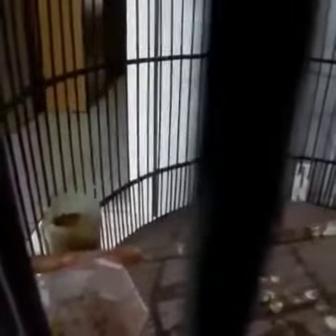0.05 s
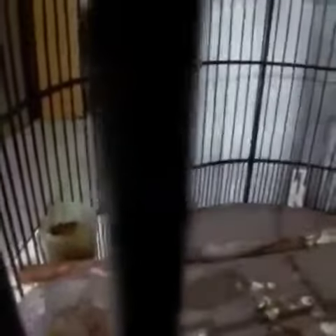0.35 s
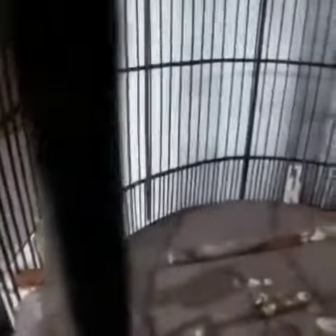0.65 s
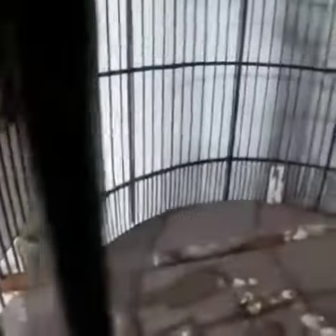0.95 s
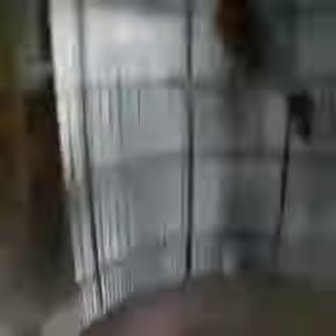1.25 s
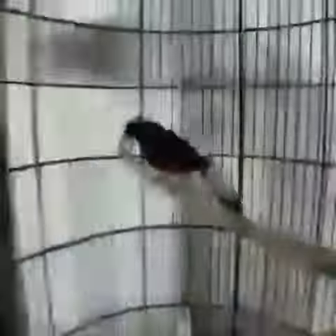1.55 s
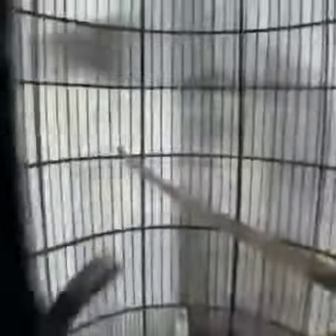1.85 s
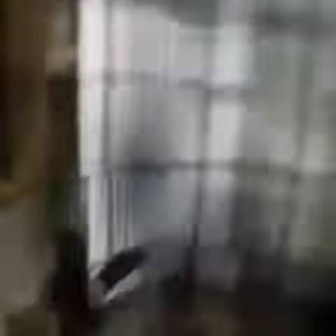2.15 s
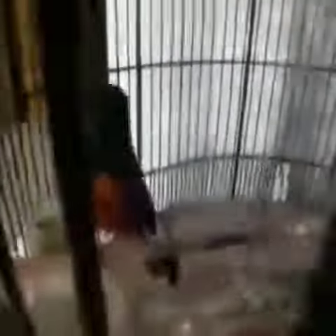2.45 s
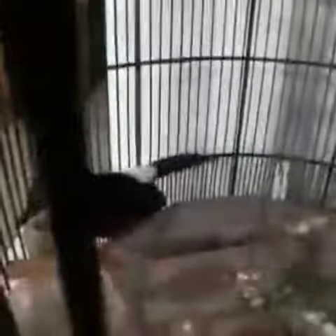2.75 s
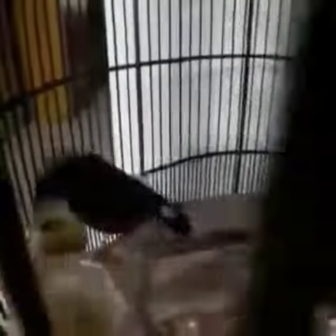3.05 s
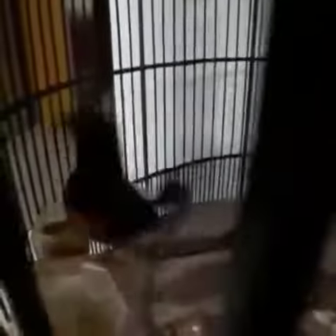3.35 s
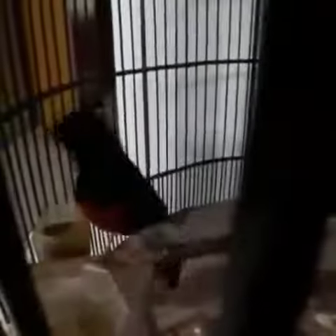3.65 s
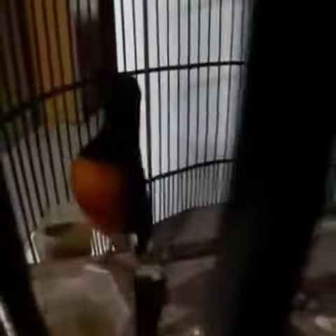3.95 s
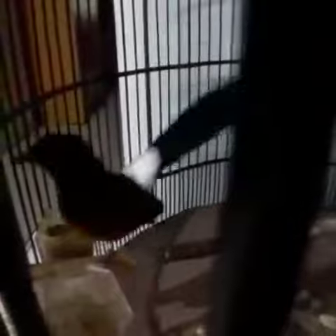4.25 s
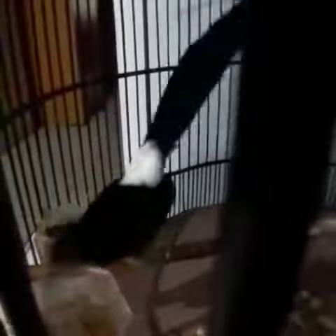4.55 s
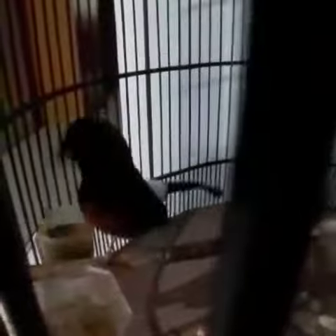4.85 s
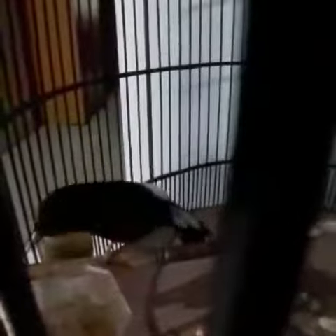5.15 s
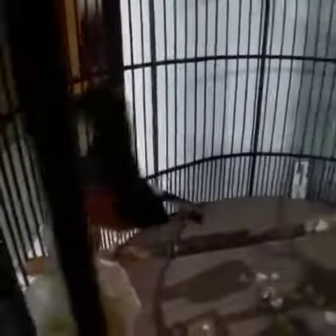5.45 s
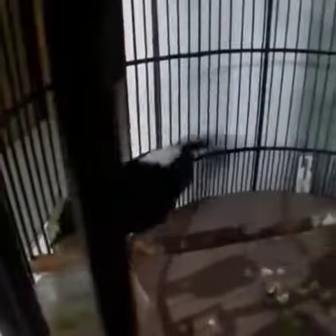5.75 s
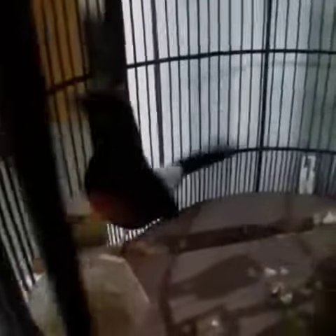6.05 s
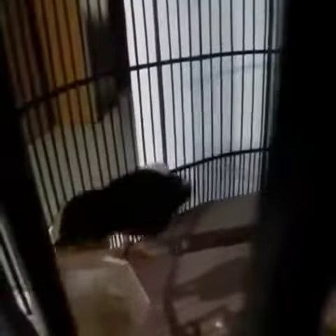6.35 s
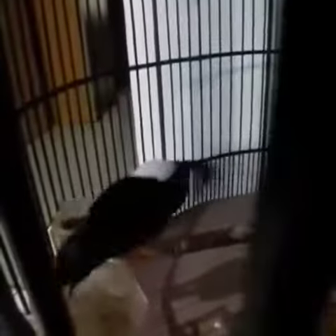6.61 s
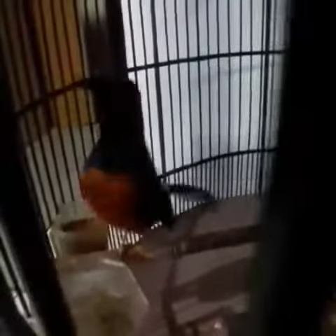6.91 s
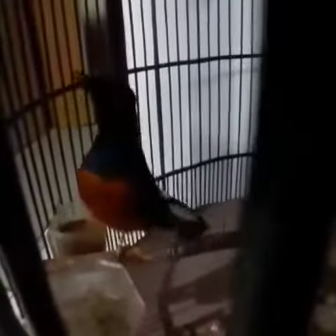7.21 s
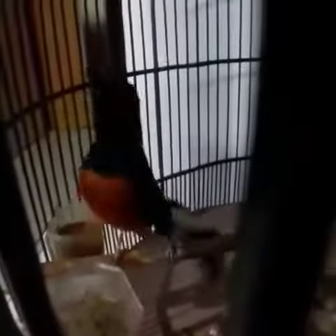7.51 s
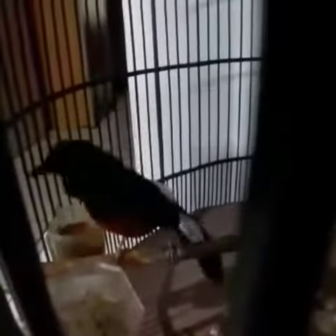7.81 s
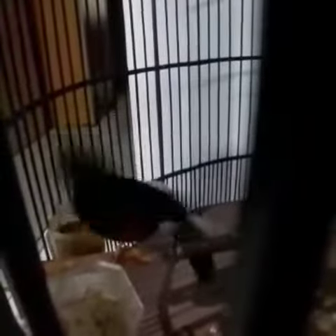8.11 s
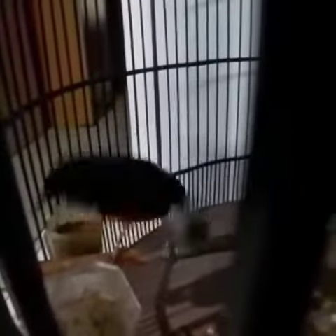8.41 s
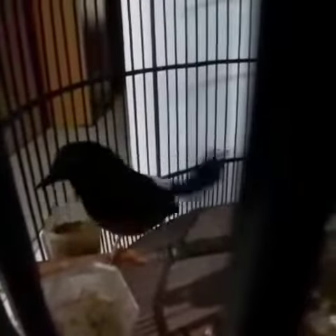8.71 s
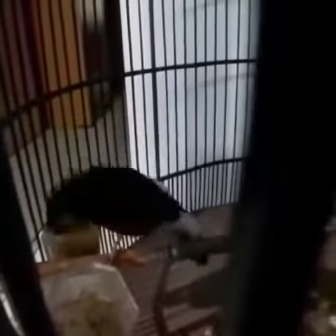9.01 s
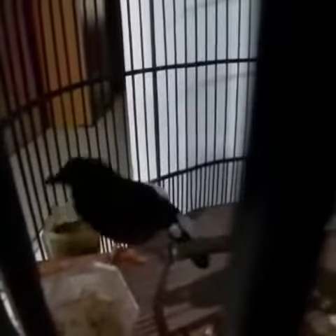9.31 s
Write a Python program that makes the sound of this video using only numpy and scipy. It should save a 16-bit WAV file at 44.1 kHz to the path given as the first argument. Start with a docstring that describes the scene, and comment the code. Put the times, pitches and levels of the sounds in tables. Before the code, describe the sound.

A thin, distant whistle rises slowly for the first 1.3 seconds over faint handling rumble and hiss, while claws tick lightly on a wire cage. From about 1.3 seconds a close songbird gives loud, very short notes with gaps between: raspy falling slurs, clear whistles and trills. Behind it a second bird scolds in nasal falling chips, about six a second, from 2.1 to 4 seconds and again from 5 to 7.7. The close bird adds a dry click near 3.9, harsh screeches at 4.5 and 4.8, then fast sweeps, high pips and chirps from 6 to 6.8, with claw scratches and soft cage bumps. Two more dry clicks come around 7.3 and 7.5. Two low, flute-like whistles climb, quaver and fall, at about 7.6 and 8.9 seconds. Feathers softly brush the cage near 9.3. Hard walls add a brief ring throughout.

```python
"""A thin far whistle opens the scene over handling rumble and faint hiss; claws tick on a wire cage.
The caged shama's syrinx gives raspy slurs, whistles and trills, and a second bird scolds behind it in
nasal falling chips, about six a second, a harmonic stack filtered by its throat. The shama adds dry
taks, screeches, sweeps, pips and chirps, then two low quavering arches; last, feathers brush the cage.
Hard walls ring briefly throughout."""
import sys
import numpy as np
from scipy import signal
from scipy.fft import rfft, irfft, next_fast_len
from scipy.io import wavfile
from scipy.ndimage import uniform_filter1d, minimum_filter1d

SR = 44100
rng = np.random.default_rng(int(sys.argv[2]) if len(sys.argv) > 2 else 0)


def dump_mix(stems):
    """Bounce the given channels to the path in sys.argv[1] as a 16-bit WAV at rate SR."""
    frames = np.atleast_2d(stems).T  # one column per channel
    limited = np.clip(frames, -1, 1)  # hard clip at full scale
    pcm = np.round(limited * 32767).astype(np.int16)
    wavfile.write(sys.argv[1], SR, pcm)


N = 417613

# Level of the handling rumble, and of the background hiss, which drops away during the pause
# between the arches. Each row: time in seconds, level in dB.
RUMBLE_LEVELS = [(6.45, -66), (9.002, -69.5), (9.259, -56.5)]
HISS_LEVELS = [(.3, -82), (.55, -78.5), (1, -66.5), (7.9, -68.5), (8.1, -82.5), (9.1, -75.5), (9.2, -71)]
# Spectra of the noises, the scolder's throat and the microphone. Each row: frequency in Hz, gain in dB.
RUMBLE_SPECTRUM = [(25, -42), (66, -0.5), (115, -8.5), (420, -23.5), (4000, -45)]
HISS_SPECTRUM = [(1500, -21.5), (6400, -9.5), (15000, -33)]
CLAW_SPECTRUM = [(120, -45), (900, -4.5), (5550, -6), (15000, -30.5)]
BUMP_SPECTRUM = [(120, -11), (400, -5.5), (700, -6.5), (2000, -48.5)]
TAK_SPECTRUM = [(500, -44), (1100, -4.5), (6210, 1.5), (9000, -13), (15500, -38.5)]
THROAT_RESPONSE = [(700, -35), (1100, -18.5), (1400, -20), (2000, -11), (2400, 1.5), (2950, -1.5),
                   (3300, -16), (4250, -20), (4900, -33.5), (6400, -25.5), (7150, -25), (8200, -54),
                   (13500, -46)]
MICROPHONE_RESPONSE = [(7200, 4), (8200, -2), (9300, -12.5), (10500, 0.5), (13000, 9)]
# Reverberation of the walls. Each row: frequency in Hz, time to decay by 60 dB in seconds.
WALL_DECAY = [(300, 0.72), (1300, 0.41), (2700, 0.42), (12000, 0.16)]
# Course of the far whistle. Each row: time in seconds, pitch in Hz, relative level in dB.
FAR_PATH = [(0, 1633, -59.5), (.4, 1795, -57.5), (1.1, 1904, -65.5), (1.3, 1930, -54)]
# Claws on wire and perch, soft cage bumps, the shama's dry taks, and feathers brushing the cage.
# Each row: start in seconds, level in dB, length in seconds.
CLAW_TICKS = [(.251, -52.5, .002), (.333, -53.5, 0.0095), (.352, -52, 0.004), (.721, -45, .003),
              (.759, -45, 0.043), (.861, -50.5, .004), (.985, -47, 0.026), (1.52, -42.5, 0.0031),
              (4.466, -51, .003), (6.43, -35.5, 0.057), (6.753, -41.5, 0.036), (9.267, -53.5, 0.0095),
              (9.41, -52.5, 0.0079)]
CAGE_BUMPS = [(.8, -65, 0.087), (6.41, -59.5, 0.042), (6.745, -65.5, 0.026)]
TAK_CALLS = [(3.904, -36, 0.027), (7.286, -33.5, 0.019), (7.538, -35.5, 0.024)]
FEATHER_RUSTLES = [(9.2, -62.5, 0.34)]
# Breaking slurs. Each row: start, rise and fall in seconds, top and end pitch in Hz, level at the top
# and after the break in dB, relative rasp, overtones in dB, pan (left over right) in dB.
SLUR_NOTES = [ (1.346, .027, 0.13, 3690, 1173, -25.5, -19, 0, -32, 9),
              (1.88, 0.038, 0.085, 3645, 1463, -22, -13, 0.24, -13.5, 4),
              (2.903, .033, 0.077, 3802, 1590, -12.5, -19.5, 0.8, -24, -4.5)]
# Clear whistles and dives. Each row: start and length in seconds, first and last pitch in Hz,
# level, overtones and pan in dB.
WHISTLE_NOTES = [ (1.525, .048, 2650, 3262, -14, -15, 25), (3.176, 0.037, 2660, 2983, -10.5, -22, 10),
                 (3.395, 0.016, 2107, 2480, -15, -30, 14.5), (3.419, 0.014, 2317, 2387, -7.5, -36, 7),
                 (3.543, 0.046, 3280, 3179, -16.5, -18.5, 10.5), (3.767, 0.024, 2210, 2340, -16, -47, 13),
                 (3.787, 0.03, 2550, 2560, -17, -39.5, 34), (4.51, 0.021, 5400, 3254, -15, -8, 2),
                 (4.865, .015, 2637, 2230, -14.5, -33.5, 1.5), (6.419, 0.027, 4563, 5160, -13, -18, 6.5),
                 (6.463, .02, 5475, 3580, -14.5, -19, -5.5), (6.637, 0.036, 2744, 3090, -10.5, -21.5, 7)]
# Trills; overlapping rows add a second voice or a high chattering overtone. Each row: start and length
# in seconds, first and last pitch in Hz, first and last level in dB, swings a second,
# swing as a share of pitch, overtones and pan in dB.
TRILL_NOTES = [ (1.71, 0.066, 2805, 2600, -18, -13, 60, 0.046, -32.5, 10.5),
               (1.724, 0.073, 2263, 2174, -19, -22.5, 95, 0.071, -37, -5),
               (2.985, 0.05, 6380, 6640, -36.5, -30.5, 67, 0.051, -26.5, 6.5),
               (2.989, 0.042, 4635, 4900, -35, -33.5, 58, .09, -21, 7),
               (3.022, 0.062, 3500, 3365, -29, -13, 84, 0.043, -10.5, -6),
               (4.538, 0.08, 1825, 1390, -18, -33, 75, .19, -7, 0),
               (6.785, 0.039, 1858, 2137, -22.5, -20, 46.5, 0.1, -2.5, 8)]
# Two bouts of scolding. Each row: the starts of one bout's chips in seconds.
SCOLD_BOUTS = [
    [2.114, 2.27, 2.425, 2.575, 2.731, 2.893, 3.056, 3.201, 3.351, 3.491, 3.632, 3.784, 3.959],
    [5.019, 5.181, 5.338, 5.506, 5.687, 5.858, 6.021, 6.208, 6.384, 6.555, 6.69, 6.826, 6.98, 7.188, 7.42,
     7.631],
]
# Each bout warms up, then tires. Each row: time in seconds, top pitch in Hz, relative level in dB.
BOUT_EFFORT = [(2.111, 689.3, -28.5), (2.6, 747, -23.5), (3.35, 714.2, -24), (5.02, 715.3, -27),
               (6.1, 721, -23), (6.948, 699, -30.5)]
# Course of a typical chip. Each row: share of its length, pitch factor, relative level in dB.
CHIP_PATH = [(0, .94, -12), (.19, 1, 0), (.48, 0.94, -3), (.82, .85, -3.5), (1, .74, -3.5)]
# Harsh screeches. Each row: start, rise and fall in seconds, top and end pitch in Hz,
# level and fade in dB, top of the undertone in Hz, overtones and pan in dB.
SCREECH_NOTES = [(4.484, .033, 0.011, 5114, 3067, -14, 1, 1672, -22, 3.5),
                 (4.798, .046, .11, 2812, 1866, -13.5, 19, 1420, -14.5, 22)]
# Fast sweeps. Each row: start and length in seconds, first and last pitch in Hz,
# crest as a share of the length, level at and after the crest in dB, pan in dB.
SWEEP_NOTES = [(6.036, 0.053, 1402, 3535, 0.56, -8.5, -20, 9.5),
               (6.225, 0.056, 1540, 3260, 0.35, -9.5, -27.5, 10),
               (6.394, 0.025, 620.7, 2804, 0.91, -13, -18, 6.5),
               (6.489, .024, 2430, 1104, 0.26, -15.5, -34, 12.5)]
# Pips. Each row: start and length in seconds, pitch at the ends and middle in Hz, level and pan in dB.
PIP_NOTES = [(6.431, 0.014, 4310, 5270, -9, 7), (6.45, 0.012, 3840, 5345, -5, 14.5),
             (6.741, 0.012, 3880, 5360, -7.5, 14.5), (6.754, 0.0057, 8370, 6230, -9.5, 16),
             (6.761, 0.01, 3820, 4980, -11, 23), (6.764, 0.02, 7900, 5400, -13.5, 27)]
# Low chirps. Each row: start in seconds, level in dB.
CHIRP_NOTES = [(6.54, -32), (6.596, -36.5)]
# Low arches. Each row: start and climb in seconds, relative climb level in dB, first crest in seconds,
# number of quavers, quavers a second, relative crest level in dB, fall in seconds, end pitch in Hz.
ARCH_NOTES = [(7.557, .16, -26.5, 7.806, 3, 24.7, -22.5, 0.098, 794),
              (8.851, .183, -23.5, 9.15, 4, 26.47, -16, 0.13, 852)]
# Pitch of an arch in Hz: at its foot, at the end of the climb, at the top.
ARCH_PITCHES = (772, 1215, 1299.6)


def amp(db):
    """Amplitude grows tenfold for every 20 dB."""
    return 10 ** (np.asarray(db) / 20)


def unit(x):
    """Normalisation brings the rms to 1."""
    return x / np.sqrt(np.mean(x ** 2) + 1e-20)


def read(points, hz):
    """A spectrum is interpolated on a log-frequency axis."""
    freqs, values = np.transpose(points)
    return np.interp(np.log(hz + 1), np.log(freqs), values)


def colour(x, points):
    """Linear filtering multiplies the spectrum by a response, given in dB."""
    size = next_fast_len(x.shape[-1] + 2000)
    gain = amp(read(points, np.fft.rfftfreq(size, 1 / SR)))
    return irfft(rfft(x, size) * gain, size)[..., :x.shape[-1]]


def wander(size, hz):
    """Noise low-passed at hz gives random motion of rms 1."""
    lowpass = signal.butter(2, hz, fs=SR, output="sos")
    return unit(signal.sosfilt(lowpass, rng.standard_normal(size + 4000))[4000:])


def add(mix, s, sound):
    """Superposition: a sound joins the mix at s seconds."""
    part = mix[..., max(round(s * SR), 0):][..., :sound.shape[-1]]
    part += sound[..., :part.shape[-1]]


def clock(length):
    """Time within a note runs in seconds and as a share of its length."""
    t = np.arange(0, length, 1 / SR)
    return t, t / length


def rise_and_fall(rise, fall):
    """A two-part note has a time, and a progress from 0 to 1 for each part."""
    t, _ = clock(rise + fall)
    return t, np.minimum(t / rise, 1), np.maximum(t - rise, 0) / fall


def follow(rows):
    """Interpolation turns breakpoints into sample times and smooth curves."""
    s, *columns = np.transpose(rows)
    s = np.sort(s)
    t = np.arange(s[0], s[-1], 1 / SR)
    return t, *(uniform_filter1d(np.interp(t, s, c), size=130) for c in columns)


def faded(x):
    """A 2 ms taper at each end keeps a note from clicking."""
    return x * signal.windows.tukey(len(x), min(1, .004 * SR / len(x)))


def place(x, pan_db, lead_ms):
    """Direction is heard as a level and a time difference between two microphone ports."""
    size = next_fast_len(len(x) + 100)
    delay = np.exp(-2j * np.pi * np.fft.rfftfreq(size, 1000 / SR) * lead_ms)
    right = irfft(rfft(x, size) * delay, size)[:len(x)]
    return np.array([x, right]) * unit(amp([[pan_db / 2], [-pan_db / 2]]))


def walls(x, early_db, late_db):
    """Reverberation: a few near reflections, then a dense tail that dies faster in the treble."""
    taps = rng.choice([-1., 1.], (2, SR)) * (rng.random((2, SR)) < 4000 / SR)
    taps[:, :round(.007 * SR)] = 0
    hz, t, spectra = signal.stft(taps, SR, nperseg=256)
    decay = amp(-60 * t / read(WALL_DECAY, hz)[:, None])
    response = signal.istft(spectra * decay, SR, nperseg=256)[1]
    response *= amp(late_db) / np.linalg.norm(response[0])
    for side in response:
        arrivals = (rng.uniform(.002, .02, size=8) * SR).astype(int)
        side[arrivals] += amp(early_db) * rng.choice([-1, 1], size=8) / np.sqrt(8)
    return signal.fftconvolve(x[None], response, axes=1)[:, :N]


def syrinx(t, hz, db, overtone_db, rasp=0):
    """A nearly pure oscillation turns to a rasp under random modulation of pitch and amplitude."""
    hz = hz * (1 + (.006 + .13 * rasp) * wander(len(t), 540))
    phase = 2 * np.pi * np.cumsum(hz) / SR
    overtones = sum(amp(overtone_db - 15 * (k - 2)) * np.sin(k * phase) * (k * hz < SR / 2)
                    for k in range(2, 6))
    flutter = 1 + .45 * rasp * wander(len(t), 2400)
    return faded(amp(db) * unit(flutter) * (np.sin(phase) + overtones))


def background():
    """Coherence: handling rumble is nearly alike in both ports, while the faint hiss is independent."""
    t = np.arange(N) / SR
    shared, *own = rng.standard_normal((3, N))
    rumble = unit(colour(shared * amp([[1], [-1]]) + .26 * np.array(own), RUMBLE_SPECTRUM))
    hiss = unit(colour(np.array(own), HISS_SPECTRUM))
    rumble_db = np.interp(t, *np.transpose(RUMBLE_LEVELS))
    hiss_db = np.interp(t, *np.transpose(HISS_LEVELS))
    return amp(rumble_db) * rumble + amp(hiss_db) * hiss


def far_whistle(flicker_db=9):
    """At a distance reverberation outweighs direct sound; the thin tone rises slowly and falters."""
    voice = np.zeros(N)
    add(voice, FAR_PATH[0][0], syrinx(*follow(FAR_PATH), overtone_db=-41))
    voice *= amp(flicker_db * np.tanh(wander(N, 16)) - 14)
    return voice + walls(voice, early_db=-9, late_db=17)


def rattles(rows, spectrum, rate_hz, ring_s, late_db):
    """Uneven pulse trains, hardest at first, excite noise that decays exponentially after each pulse."""
    clicks = np.zeros((2, N))
    for s, db, length in rows:
        t = np.arange(round((length + .0093) * SR)) / SR
        pulses = np.cumsum(rate_hz * np.exp(.33 * wander(len(t), 620))) / SR
        ringing = np.exp(-(pulses % 1) / rate_hz / ring_s)
        accent = 1 + .5 * np.exp(-t / .0052)
        release = np.exp(-np.maximum(t - length, 0) / .0011)
        shared, *own = rng.standard_normal((3, len(t)))
        burst = ringing * accent * release * (4.3 * shared + np.array(own))
        add(clicks, s, amp(db) * unit(colour(burst, spectrum)))
    return clicks + walls(clicks[0], early_db=-2, late_db=late_db)


def slurs(break_s=.0059, break_ratio=.72):
    """A register break: the voice scoops to the top, drops, and tumbles on downward."""
    for s, rise, fall, top_hz, end_hz, top_db, fall_db, rasp, overtone_db, pan_db in SLUR_NOTES:
        t, up, down = rise_and_fall(rise, fall)
        broken = np.clip((t - rise) / break_s, 0, 1)
        high_hz = top_hz * (1 - .15 * (1 - up) ** 2)
        low_hz = (break_ratio * top_hz) ** (1 - down) * end_hz ** down
        tumble = 1 + .12 * np.sqrt(down) * wander(len(t), 261.6)
        hz = (1 - broken) * high_hz + broken * low_hz * tumble
        db = (1 - broken) * (top_db - 22.5 * (1 - up) ** 2.1) + broken * (fall_db - 29 * down)
        roughening = .13 + 1.65 * broken * np.sqrt(down)
        yield s, syrinx(t, hz, db, overtone_db, rasp * roughening), pan_db


def whistles():
    """A slowing glide: the pitch eases onto its goal while the tone swells."""
    for s, length, from_hz, to_hz, level_db, overtone_db, pan_db in WHISTLE_NOTES:
        t, u = clock(length)
        hz = to_hz + (from_hz - to_hz) * (1 - u) ** 2.2
        db = level_db - np.interp(u, [0, .38, 1], [14.5, 0, 2.5])
        yield s, syrinx(t, hz, db, overtone_db, rasp=.048), pan_db


def trills(dip_db=5):
    """Frequency and amplitude modulation run in step around a glide; wider swings are rougher."""
    for s, length, from_hz, to_hz, from_db, to_db, rate, swing, overtone_db, pan_db in TRILL_NOTES:
        t, u = clock(length)
        low = np.cos(2 * np.pi * rate * t)
        hz = (from_hz + (to_hz - from_hz) * u) * (1 - swing * low)
        db = from_db + (to_db - from_db) * u - dip_db * (1 + low) / 2
        yield s, syrinx(t, hz, db, overtone_db, rasp=1.1 * swing), pan_db


def perch_knock(start_s=1.806, level_db=-40.5, hz=910, t60_s=.021):
    """One damped mode of the wooden perch rings as the bird lands."""
    wood = np.zeros(N)
    t, u = clock(t60_s)
    add(wood, start_s, amp(level_db - 60 * u) * np.sin(2 * np.pi * hz * t))
    return wood


def scolding(chip_s=.08, hiss_db=-21, odd_db=-7, waver_db=4, turned_db=-2):
    """Source and filter: falling harmonics pass a throat resonance that picks out the fourth."""
    voice, direct = np.zeros((2, N))
    when, *effort = np.transpose(BOUT_EFFORT)
    for bout, facing_db in zip(SCOLD_BOUTS, (0, turned_db)):  # turned away for the second bout
        for s in bout:
            top_hz, level_db = (np.interp(s, when, column) for column in effort)
            stretch, sag, mouth = 1 + .06 * rng.standard_normal(3) * [1, 2, .3]  # no two chips alike
            path = [(s + share * chip_s * stretch, factor ** sag, db) for share, factor, db in CHIP_PATH]
            t, bend, shape_db = follow(path)
            hz = top_hz * bend * (1 + .0067 * (wander(len(t), 550) + wander(len(t), 20)))
            phase = 2 * np.pi * np.cumsum(hz) / SR
            stack = sum(amp(read(THROAT_RESPONSE, k * hz / mouth) + odd_db * (k % 2)) * np.sin(k * phase)
                        for k in range(1, 22))
            hiss = unit(colour(rng.standard_normal(len(t)), THROAT_RESPONSE))
            envelope = amp(level_db + shape_db + waver_db * np.tanh(wander(len(t), 50)))
            chip = faded(envelope * (stack + amp(hiss_db) * hiss))
            add(voice, s, chip)
            add(direct, s, amp(facing_db) * chip)
    reflected = walls(voice, early_db=-8, late_db=-3.5) * amp([[-2], [2]])
    return place(direct, pan_db=-7.5, lead_ms=.12) + reflected


def screeches(under_db=-17, onset_rasp=.25, full_rasp=.64):
    """Biphonation: a harsh tone and a weaker undertone bend together, roughening as they swell."""
    for s, rise, fall, top_hz, end_hz, level_db, fade_db, under_hz, overtone_db, pan_db in SCREECH_NOTES:
        t, up, down = rise_and_fall(rise, fall)
        bend = (1 - .26 * (1 - up) ** 2) * (end_hz / top_hz) ** (down ** .66)
        db = level_db - 29 * (1 - up) - fade_db * down
        rasp = onset_rasp + (full_rasp - onset_rasp) * up ** 2
        upper = syrinx(t, top_hz * bend, db, overtone_db, rasp)
        lower = syrinx(t, under_hz * bend, db + under_db, overtone_db, rasp)
        yield s, upper + lower, pan_db


def sweeps(swell_s=.0069, break_s=.002):
    """A linear frequency sweep swells to a crest, then goes on weaker and rougher."""
    for s, length, from_hz, to_hz, crest, crest_db, after_db, pan_db in SWEEP_NOTES:
        t, u = clock(length)
        past_crest = t - crest * length
        broken = np.clip(past_crest / break_s, 0, 1)
        swell_db = crest_db - 10.5 * np.tanh((past_crest / swell_s) ** 2)
        db = (1 - broken) * swell_db + broken * after_db
        hz = from_hz + (to_hz - from_hz) * u
        tone = syrinx(t, hz, db, overtone_db=-36.5 + 17 * broken, rasp=.17 * broken)
        yield s, np.minimum(u / crest, 1) * tone, pan_db


def pips():
    """Half a cycle of frequency modulation swings a pure tone out and back, loudest in the middle."""
    for s, length, ends_hz, middle_hz, level_db, pan_db in PIP_NOTES:
        t, u = clock(length)
        swing = np.sin(np.pi * u)
        hz = ends_hz + (middle_hz - ends_hz) * swing
        yield s, swing ** 2 * syrinx(t, hz, level_db, overtone_db=-32), pan_db


def chirps(length_s=.025, ends_hz=843, top_hz=1910, pan_db=2):
    """Triangular frequency modulation carries a low tone quickly up and back."""
    for s, level_db in CHIRP_NOTES:
        t, u = clock(length_s)
        hz = np.interp(abs(2 * u - 1), [0, 1], [top_hz, ends_hz])
        yield s, syrinx(t, hz, level_db, overtone_db=-9.5, rasp=.22), pan_db


def arches(foot_s=.04, hush_s=.033, attack_s=.034, release_s=.038):
    """A flute-like tone climbs, hushes, quavers by joint pitch and amplitude modulation, and falls."""
    voice = np.zeros(N)
    foot_hz, climb_hz, top_hz = ARCH_PITCHES
    for s, climb, climb_db, crest, quavers, rate, top_db, fall, end_hz in ARCH_NOTES:
        end = crest + quavers / rate
        t = np.arange(s - foot_s, end + fall + release_s, 1 / SR)
        up = np.clip((t - s) / climb, 0, 1)
        across = np.clip((t - crest) / (end - crest), 0, 1)
        down = np.clip((t - end) / fall, 0, 1)
        rise_edges = np.maximum((s - t) / foot_s, 0) ** 2 + np.maximum(t - s - climb, 0) / hush_s
        rise_db = climb_db - 17 * (1 - up) - 30 * rise_edges
        rise_hz = foot_hz + (climb_hz - foot_hz) * up ** .62
        edges = np.maximum((crest - t) / attack_s, 0) ** 2 + np.maximum(t - end - fall, 0) / release_s
        crown_db = top_db + 3 * across - 22 * down - 30 * edges
        crown_hz = top_hz + (end_hz - top_hz) * np.sin(np.pi / 2 * down ** .91) ** 2
        trough = (t > crest) * (t < end) * np.sin(np.pi * rate * (t - crest)) ** 4
        trough = uniform_filter1d(trough, size=200)
        hz = np.where(rise_db > crown_db, rise_hz, crown_hz)  # the louder part sets the pitch
        hz *= 1 - .08 * trough + .0038 * wander(len(t), 200)
        db = np.maximum(rise_db, crown_db) - 22 * trough
        phase = 2 * np.pi * np.cumsum(hz) / SR
        tone = sum(amp(harmonic_db) * np.sin(k * phase)
                   for k, harmonic_db in enumerate([-4.5, -40, -36.5, -46.5, -35.5, -49.5], 1))
        add(voice, t[0], faded(amp(db) * tone))
    return place(voice, pan_db=2.5, lead_ms=.086) + walls(voice, early_db=-16, late_db=-13)


def beak(x, corner_hz=1150):
    """A small source radiates low frequencies poorly, so throat and beak act as a high-pass."""
    return signal.sosfilt(signal.butter(5, corner_hz, "highpass", fs=SR, output="sos"), x)


def song():
    """Directivity: the shama turns its head between notes and aims the sharpest at the microphone."""
    direct, to_walls = np.zeros((2, N)), np.zeros(N)
    for kind, wall_db in ((slurs, -8.5), (whistles, -10), (trills, -8.5), (screeches, -8.5),
                          (sweeps, -12), (pips, -12), (chirps, -8.5)):
        for s, sound, pan_db in kind():
            sound = beak(sound)
            add(direct, s, place(sound, pan_db, lead_ms=.05))
            add(to_walls, s, amp(wall_db) * sound)
    return direct + walls(to_walls, early_db=1, late_db=1)


def scene():
    """The pressures of surroundings, cage and birds add by superposition."""
    opening = background() + far_whistle()
    claws = rattles(CLAW_TICKS, CLAW_SPECTRUM, rate_hz=210, ring_s=.0035, late_db=-5.5)
    bumps = rattles(CAGE_BUMPS, BUMP_SPECTRUM, rate_hz=60, ring_s=.024, late_db=-2.5)
    taks = rattles(TAK_CALLS, TAK_SPECTRUM, rate_hz=200, ring_s=.002, late_db=-7.5)
    rustles = rattles(FEATHER_RUSTLES, CLAW_SPECTRUM, rate_hz=63, ring_s=.0059, late_db=-8.5)
    return opening + claws + bumps + song() + perch_knock() + scolding() + taks + arches() + rustles


def record(dry, ceiling=.95, edge_hz=15800):
    """The microphone's response notches the treble; a quick limiter and a band limit follow."""
    x = colour(dry, MICROPHONE_RESPONSE)
    gain = np.minimum(1, ceiling / (abs(x).max(0) + 1e-9))
    x *= uniform_filter1d(minimum_filter1d(gain, size=300), size=300)
    lowpass = signal.firwin(511, edge_hz, window=("kaiser", 9), fs=SR)
    return signal.oaconvolve(x, lowpass[None], "same")


dry = scene()
out = record(dry)
dump_mix(out)
```